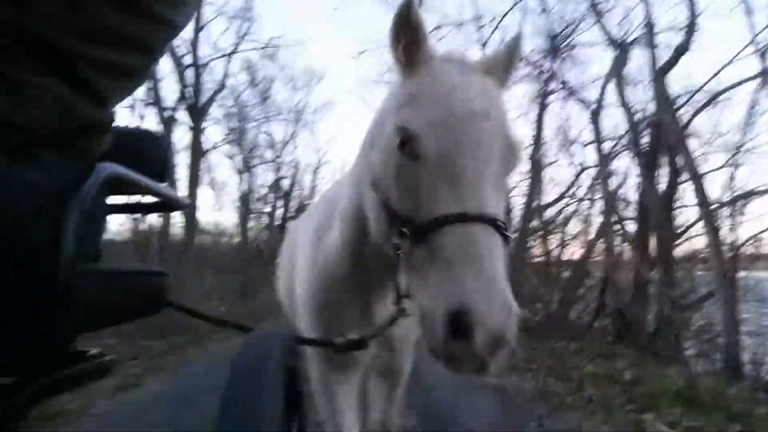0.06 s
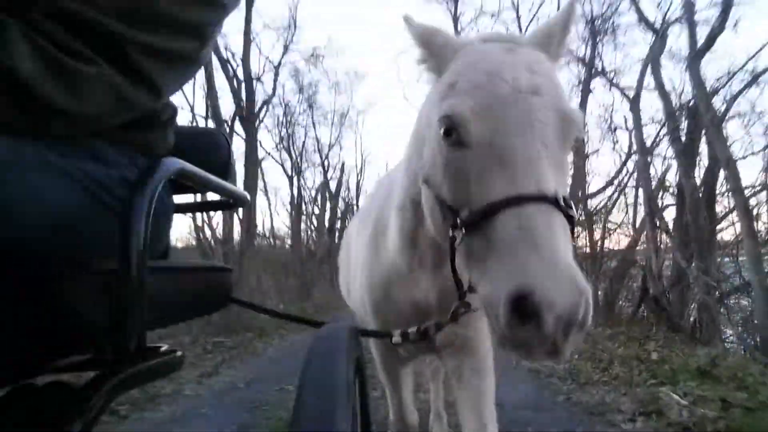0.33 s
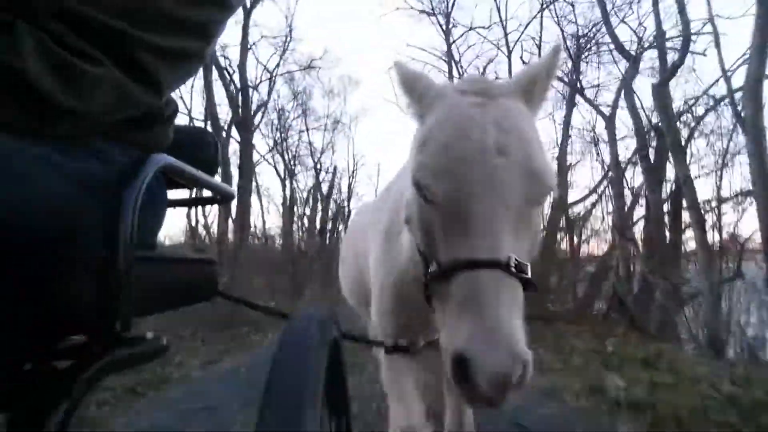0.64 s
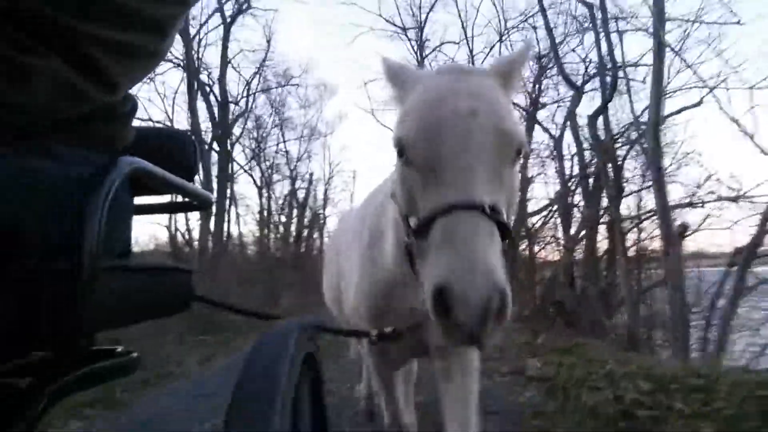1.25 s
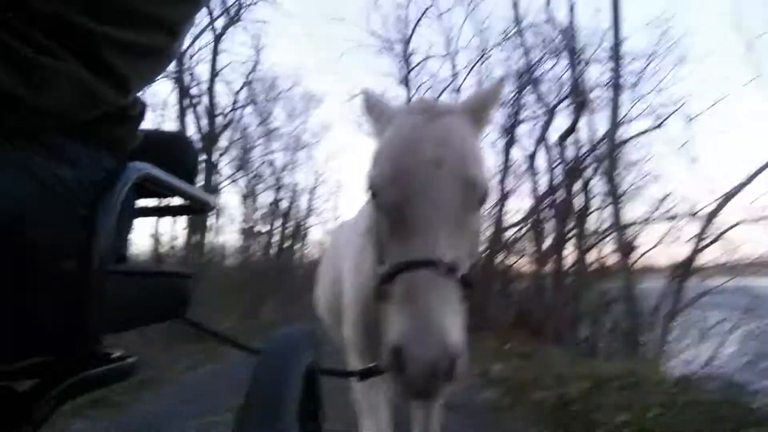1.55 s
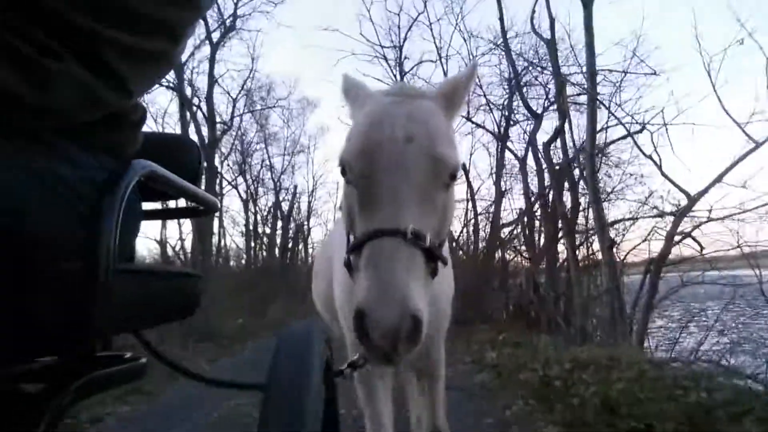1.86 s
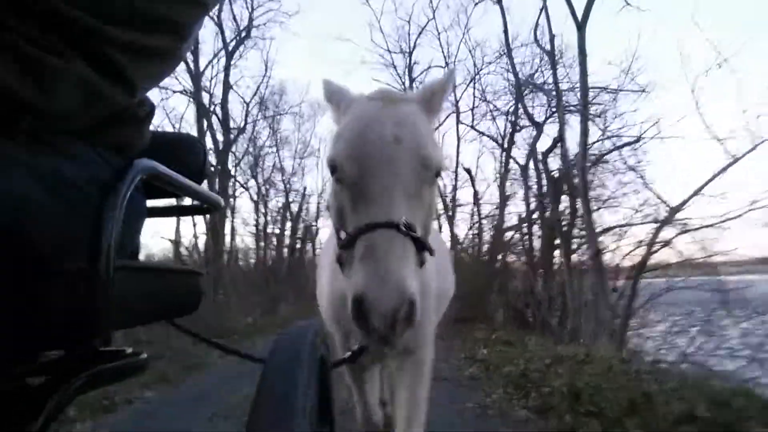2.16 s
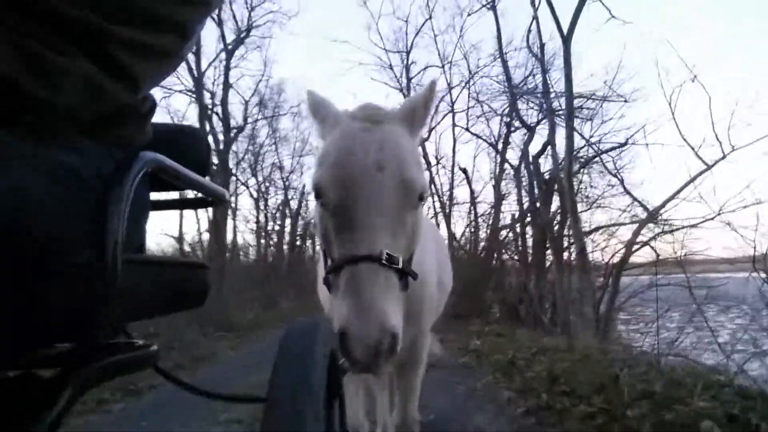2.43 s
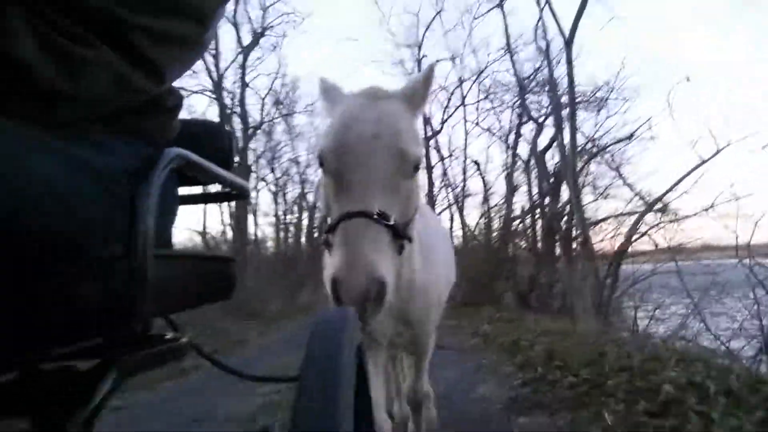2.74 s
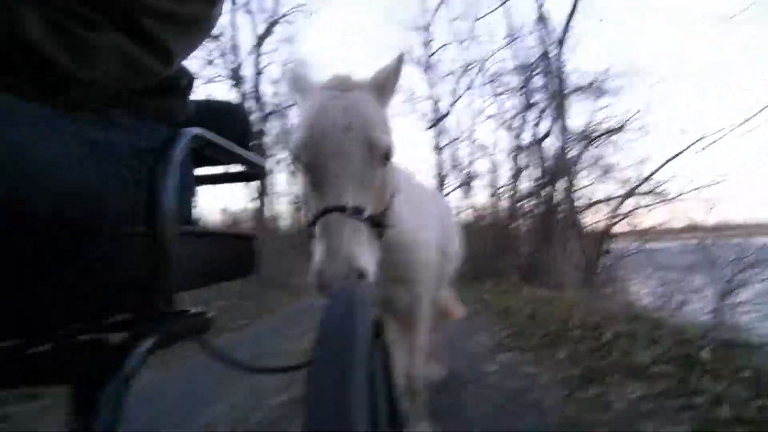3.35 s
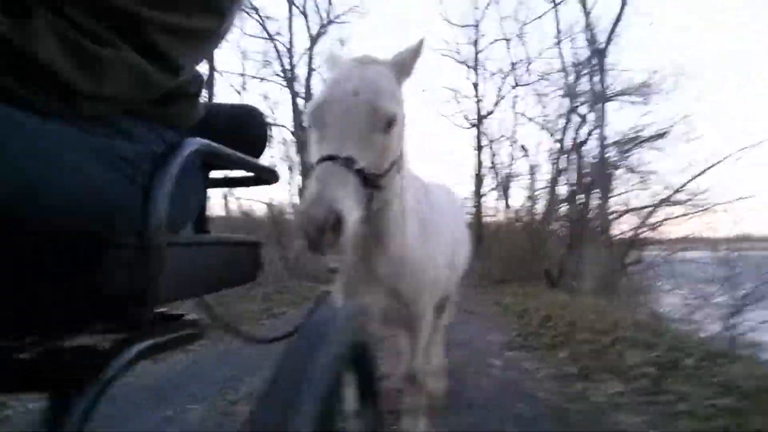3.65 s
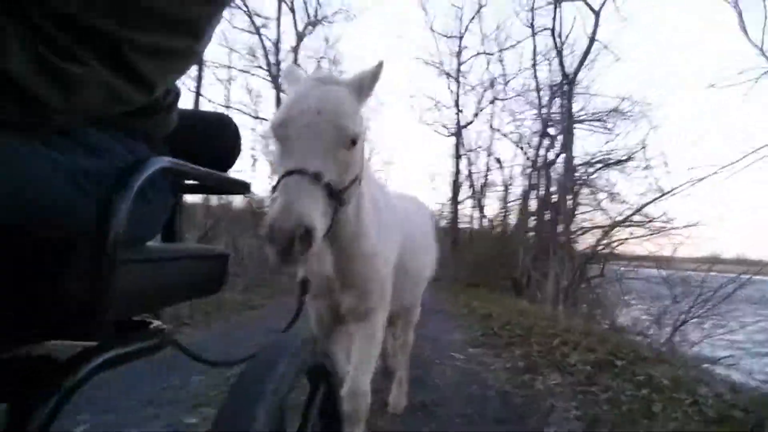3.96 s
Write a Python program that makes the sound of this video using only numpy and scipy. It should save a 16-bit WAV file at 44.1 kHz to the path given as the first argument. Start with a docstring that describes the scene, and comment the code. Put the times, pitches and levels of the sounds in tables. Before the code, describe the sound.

A light cart rumbles along a gravel path outdoors, grit crunching while a horse's hooves thud softly behind. Two hard clacks come in the first half. The microphone rides on the cart, catching jacket swishes and low wind.

```python
"""On a gravel path, a light cart rolls along with a led horse walking behind it.
The uneven ground shakes the cart into a rumble, and grit crunches under tyres and hooves.
Hoof falls and bumps excite the low modes of the body; hard parts rattle on the frame, with two
hard clacks. The microphone rides on the cart, close to a jacket whose cloth swishes and
crackles by friction. Low wind slowly dies down at both ports, and buffets hit the right one."""
import sys
import numpy as np
from scipy import signal
from scipy.fft import rfft, irfft, next_fast_len
from scipy.io import wavfile

SR = 44100
rng = np.random.default_rng(int(sys.argv[2]) if len(sys.argv) > 2 else 0)


def inscribe(sig):
    """Save sig as 16-bit PCM at rate SR to the path in sys.argv[1].

    A 1-D sig is mono; a 2-D sig holds one channel per row.
    Samples are clipped to [-1, 1] before scaling.
    """
    pcm = np.round(np.clip(np.atleast_2d(sig).T, -1, 1) * 32767)
    wavfile.write(sys.argv[1], SR, pcm.astype(np.int16))


N = 176400
T = np.arange(N) / SR

# Roughness of the path, as the crunch it raises. Each row: time in seconds, level in dB.
ROUGHNESS = [(0, -46), (.34, -46.5), (.46, -40), (.65, -46), (.79, -53), (.87, -41.5), (.95, -51.5),
             (1.12, -40.5), (1.33, -49.5), (1.45, -44), (1.6, -48.5), (1.73, -44), (1.8, -50.5), (1.9, -38),
             (1.98, -50.5), (2.09, -45.5), (2.56, -47.5), (2.65, -45.5), (3.48, -48), (3.83, -46.5),
             (4, -52)]
# Hoof falls and bumps. Each row: time in seconds, level in dB, pulse width in ms.
BLOWS = [(.274, -21, 0.76), (0.931, -24.5, 0.42), (1.040, -14, 0.2), (1.478, -23, 0.44),
         (1.744, -29.5, 0.21), (1.851, -25.5, 0.54), (2.322, -22, 0.43), (2.439, -26.5, 0.17),
         (2.698, -19.5, 0.42), (2.982, -26, 0.95), (3.229, -31.5, 0.22), (3.463, -21.5, 0.54),
         (3.474, -24, 0.34), (3.7539, -21.5, 0.36), (3.974, -23.5, 0.4)]
# Low modes of the cart body. Each row: frequency in Hz, gain in dB, 60 dB decay time in seconds.
BODY_MODES = [(101, -14.5, 0.13), (155, -1.5, 0.046), (252, -1.5, 0.18), (448, 2, 0.097), (640, 8, 0.031)]
BODY_LEFT_DB = -1


def from_db(db):
    """Amplitude ratio of a level in decibels."""
    return 10 ** (np.asarray(db) / 20)


def rms_one(x):
    """Normalisation to an rms of 1."""
    return x / np.sqrt(np.mean(x ** 2) + 1e-20)


def coloured(x, points):
    """Minimum-phase filter through (Hz, dB) points; folding the cepstrum makes it causal."""
    size = next_fast_len(N + SR // 2) // 2 * 2
    hz, db = np.transpose(points)
    bin_hz = np.arange(size // 2 + 1) * SR / size
    gain = from_db(np.interp(np.log(bin_hz + 1), np.log(hz), db))
    cepstrum = irfft(np.log(gain))
    cepstrum[1:size // 2] *= 2
    cepstrum[size // 2 + 1:] = 0
    return irfft(rfft(x, size) * np.exp(rfft(cepstrum)))[..., :N]


def low_pass(x, hz):
    """Second-order low-pass filter."""
    return signal.sosfilt(signal.butter(2, hz, fs=SR, output="sos"), x)


def drift(per_s):
    """Random modulation: straight lines between normally distributed values."""
    return np.interp(T * per_s, np.arange(2000), rng.standard_normal(2000))


def grains(per_s, spread_db):
    """Shot noise: independent clicks of uneven size, with an rms of 1."""
    sizes = from_db(spread_db * np.minimum(rng.exponential(1, N), 5)) * rng.choice([-1, 1], N)
    return rms_one(sizes * (rng.random(N) < per_s / SR))


def stick_slip(depth, per_s=130, decay_s=0.0023):
    """Stick-slip envelope: sudden random releases die away over a steady floor; rms 1."""
    starts = (rng.random(N) < per_s / SR) * rng.uniform(.2, 1, N)
    bursts = rms_one(signal.lfilter([1], [1, -np.exp(-1 / (decay_s * SR))], starts))
    return rms_one(np.hypot(1, depth * bursts))


def ring(force, modes):
    """Modal superposition: a force drives damped resonators of alternating sign."""
    response = 0
    for k, (hz, db, t60) in enumerate(modes):
        radius, angle = from_db(-60 / (t60 * SR)), 2 * np.pi * hz / SR
        poles = [1, -2 * radius * np.cos(angle), radius * radius]
        mode = signal.lfilter([0, np.sin(angle)], poles, force + 1e-18)
        response = response + (-1) ** k * from_db(db) * mode
    return response


def bell(centre_s, width_s):
    """Bell-shaped envelope whose width is its standard deviation."""
    return np.exp(-.5 * np.minimum(((T - centre_s) / width_s) ** 2, 100))


def decay(start_s, decay_s):
    """Exponential decay from a sudden onset."""
    return (T >= start_s) * np.exp(-np.clip((T - start_s) / decay_s, 0, 50))


def push(centre_s, width_ms):
    """Pressure pulse: a compression, then a weaker and wider rarefaction."""
    width_s = width_ms / 1000
    return bell(centre_s, width_s) - 0.59 * bell(centre_s + 4.44 * width_s, 1.43 * width_s)


def placed(x, left_db):
    """Stereo by level difference: the left side is raised or lowered."""
    return np.array([from_db(left_db) * x, x])


def rumble(wind_hz=102, wind_fade_db_per_s=2.5):
    """Forced vibration: the cart rumbles over the path, while low wind at each port slowly dies down."""
    # Spectrum of the rumble. Each row: frequency in Hz, gain in dB.
    spectrum = [(30, -7.5), (60, -0.5), (100, -1), (165, -0.5), (205, -4), (255, -1), (305, -14),
                (540, -15), (900, -33), (3000, -45)]
    jolts = grains(per_s=2500, spread_db=2.5)
    shake = jolts - 0.85 * low_pass(jolts, wind_hz / 2)
    low_wind = 1.78 * low_pass(rng.standard_normal((2, N)), wind_hz) * from_db(-wind_fade_db_per_s * T)
    noise = shake + low_wind + 0.69 * rng.standard_normal((2, N))
    bumps = from_db(2.5 * drift(per_s=20))
    return from_db(-40.5) * rms_one(coloured(noise * bumps, spectrum))


def grit(crack_s=0.0091):
    """Granular noise: fine grit crunches and larger stones crack under load, adding in power."""
    # Cracks of larger stones. Each row: start in seconds, level in dB.
    stones = [(0.655, -35.5), (1.046, -32), (1.107, -31), (1.175, -35), (1.481, -35), (1.849, -41),
              (2.07, -34.5), (2.268, -36.5), (2.303, -36), (2.425, -37.5), (2.801, -40.5), (2.882, -38.5),
              (2.978, -35), (3.254, -40), (3.267, -35), (3.507, -34.5), (3.799, -29.5), (3.819, -36.5),
              (3.891, -38)]
    # Spectrum of crushed grit. Each row: frequency in Hz, gain in dB.
    spectrum = [(300, -15), (650, 1), (1200, -1.5), (2000, 5), (2700, 2.5), (3500, -16.5), (4700, -10.5),
                (5500, -15), (6800, -5), (8300, -31), (11000, -4), (15000, -39)]
    bed_db = np.interp(T, *np.transpose(ROUGHNESS)) + 1.9 * drift(per_s=60)
    bed = from_db(bed_db) * stick_slip(depth=from_db(-0.5))
    cracks = sum(from_db(db) * decay(s, crack_s) for s, db in stones)
    scuffs = sum(from_db(db - 20) * bell(s, crack_s) for s, db, _ in BLOWS)  # each blow crushes grit
    level = np.hypot(bed, cracks + scuffs)
    clicks = grains(per_s=3000, spread_db=2)
    texture = clicks + np.array([[1.0], [.4]]) * rng.standard_normal((2, N))
    return from_db(-1) * coloured(level * texture, spectrum) / np.std(coloured(texture, spectrum))


def cloth(snap_s=0.0015):
    """Stick-slip friction: threads slip in dense grains that swell with each swish; creases snap."""
    # Swishes of the jacket. Each row: centre in seconds, level in dB, width in seconds.
    swishes = [(0.02, -40.5, 0.062), (0.379, -32, 0.022), (0.855, -40.5, 0.029), (1.057, -39.5, 0.013),
               (1.129, -33, 0.01), (1.33, -40.5, 0.071), (1.703, -38, 0.015), (1.757, -35.5, 0.017),
               (1.911, -30, 0.0081), (2.095, -34, 0.017), (2.281, -41, 0.025), (2.453, -35.5, 0.0086),
               (2.484, -37.5, 0.011), (2.652, -31, 0.014), (2.741, -40.5, 0.018), (2.813, -39.5, 0.021),
               (2.946, -33, 0.0053), (3.145, -38, 0.014), (3.264, -39, 0.0083), (3.439, -36.5, 0.014),
               (3.666, -38, 0.047), (3.88, -41.5, 0.015)]
    # Snaps of creasing cloth or tack. Each row: start in seconds, level in dB, left gain in dB.
    creases = [(.2705, -33.5, 6), (.3445, -36, 4), (.367, -26.5, 6), (1.035, -24.5, -7), (1.1025, -28, 4),
               (1.7402, -30, 4), (2.0885, -31, 10), (2.505, -25, 5), (2.641, -26, 9), (2.937, -22.5, 3),
               (3.582, -24, -6)]
    # Spectrum of rubbing cloth. Each row: frequency in Hz, gain in dB.
    spectrum = [(1000, -20), (3500, -29.5), (4800, -14), (5600, -20.5), (6800, -7.5), (8300, -28),
                (10000, -4.5), (12000, -0.5), (14400, -0.5), (16000, -3)]
    jolt_db = np.interp(T, *np.transpose(ROUGHNESS))
    bed = from_db(-45.5 + 0.7 * (jolt_db - jolt_db.mean()))  # rough ground shakes the jacket too
    swish_power = sum((from_db(db) * bell(s, width)) ** 2 for s, db, width in swishes)
    flicker = from_db(1.5 * drift(per_s=170)) * stick_slip(depth=0.73)
    level = np.sqrt(bed ** 2 + swish_power) * flicker
    slips = np.array([grains(per_s=9800, spread_db=3) for _ in range(2)])
    slips += 0.48 * grains(per_s=15000, spread_db=3)  # common to both ports
    snap_level = sum(placed(from_db(db) * (decay(s, snap_s) + 2 * decay(s, snap_s / 10)), left_db)
                     for s, db, left_db in creases)
    snaps = snap_level * rng.choice([-1, 1], (2, N))
    return from_db(5.5) * coloured(level * rms_one(slips) + snaps, spectrum)


def wind(gust_s=0.014):
    """Turbulent pressure: buffets hit the right port amid eddies that the left catches faintly."""
    # Buffets of wind. Each row: time in seconds, level in dB, pulse width in ms.
    buffets = [(.053, -21, 1.9), (0.099, -18, 0.98), (0.194, -20.5, 1.9), (0.69, -18.5, 1.17),
               (0.716, -21.5, 1.05), (0.747, -19.5, 1.46), (.769, -26.5, 1.4), (1.444, -20, 1.46),
               (1.477, -19, 1.3), (2.166, -20.5, 2.5), (2.2145, -12, 0.74), (2.241, -14.5, 0.99),
               (2.833, -21, 1.3)]
    # Spectrum of the turbulence. Each row: frequency in Hz, gain in dB.
    spectrum = [(20, -20.5), (80, 14.5), (450, -17.5), (1100, -52.5)]
    pushes = sum(from_db(db) * push(s, ms) for s, db, ms in buffets)
    gust_power = sum(from_db(db / 2 - 20.5) ** 2 * bell(s, gust_s) for s, db, _ in buffets)
    eddies = rms_one(coloured(rng.standard_normal((2, N)), spectrum))
    left, right = placed(np.sqrt(gust_power), left_db=-11.5) * eddies
    return np.array([left, right + pushes])


def thuds():
    """Pulse excitation: soft blows set the low modes of the body humming."""
    pulses = placed(sum(from_db(db) * push(s, ms) for s, db, ms in BLOWS), BODY_LEFT_DB)
    return pulses + from_db(-54.5) * ring(pulses, BODY_MODES)


def knocks(buzz_s=0.013, treble_hz=3540):
    """Impact excitation: each hard contact cracks, chatters, buzzes and rings the frame and body."""
    # Hard parts striking the frame.
    # Each row: start in seconds, level in dB, decay time of the chatter in seconds, treble gain in dB.
    impacts = [(0.4114, 0.5, 0.0067, 5), (0.4209, -8.5, 0.0077, -6), (0.429, -13, .006, -4),
               (0.6354, -10.5, 0.001, -7), (0.8894, -6.5, 0.00097, -2.5), (1.2691, -17.5, 0.00074, -5),
               (1.4014, -2.5, 0.0022, 0.5), (1.4036, -4, 0.0066, -10), (1.43, -29, .002, -14),
               (2.1681, -19, .003, 5.5), (3.012, -22, 0.0013, 2)]
    # Modes of the frame. Each row: frequency in Hz, gain in dB.
    frame_modes = [(1130, -10), (1262, -15), (1510, -9), (1630, 1), (1960, -7.5), (2227, -11), (2480, -4),
                   (2590, 1.5)]
    # Spectrum of a contact's crack. Each row: frequency in Hz, gain in dB.
    spectrum = [(200, -25.5), (700, -6), (1100, 3), (1650, 9.5), (2650, 11), (3200, -12), (4500, -3),
                (7400, -1), (8500, -31), (10500, 1), (14500, -3.5)]
    force, dull, bright = np.zeros((3, N))
    chatter = grains(per_s=5000, spread_db=1.0)
    for s, db, chatter_s, treble_db in impacts:
        hit = np.zeros(N)
        hit[int(s * SR)] = from_db(db)
        contact = hit + from_db(db + 4.5) * chatter * decay(s, chatter_s) / np.sqrt(chatter_s * SR / 2)
        coupling_db = 0.66 * db  # weak knocks ring less than hard clacks
        force += from_db(coupling_db) * (hit + contact) / 2
        buzz = chatter[::-1] * decay(s, buzz_s) / np.sqrt(buzz_s * SR / 8)  # loose parts
        dull += contact + from_db(coupling_db - 8.5) * buzz
        bright += from_db(treble_db) * contact * decay(s, 2 * chatter_s)
    # Higher modes die sooner: 60 dB in 0.074 s at 2 kHz.
    damped_modes = [(hz, db, 0.074 * np.sqrt(2000 / hz)) for hz, db in frame_modes]
    crack = coloured(bright + low_pass(dull - bright, treble_hz), spectrum)
    frame = from_db(0.5) * crack + from_db(-23.5) * ring(force, damped_modes)
    return placed(frame, left_db=-4) + from_db(-37.5) * ring(force, BODY_MODES)


def judders(width_s=0.021):
    """Resonance: runs of small jolts drive the two highest body modes, which sound hollow."""
    # Patches of rough ground. Each row: centre in seconds, level in dB.
    patches = [(.735, -45), (1.73, -53), (1.906, -42.5), (2.19, -43)]
    level = sum(from_db(db) * bell(s, width_s) for s, db in patches)
    hollow = rms_one(ring(grains(per_s=600, spread_db=-1), BODY_MODES[-2:]))
    return placed(level * hollow, BODY_LEFT_DB)


def scene(left_lag_ms=0.18):
    """Superposition: the cart reaches the left port late; cloth and wind are at the microphone."""
    left, right = rumble() + grit() + thuds() + knocks() + judders()
    delayed_left = np.interp(T - left_lag_ms / 1000, T, left)
    return np.array([delayed_left, right]) + cloth() + wind()


def record(dry):
    """Frequency response: the left port is muffled in the mids, and both are band-limited."""
    # Sensitivity of the left port against the right. Each row: frequency in Hz, gain in dB.
    left_response = [(40, 1), (250, -5), (500, -2.5), (700, -8), (1200, -11.5), (2000, -14), (4200, -11.5),
                     (6800, -22), (9000, -7), (11000, -13.5), (13000, -1.5), (14400, 4.5)]
    ports = np.array([coloured(dry[0], left_response), dry[1]])
    low_cut = signal.butter(1, 18, "high", fs=SR, output="sos")
    port_roll_off = signal.ellip(7, .5, 38, 14490, fs=SR, output="sos")
    high_cut = signal.cheby2(14, 40, 15935, fs=SR, output="sos")
    return signal.sosfilt(np.vstack([low_cut, port_roll_off, high_cut]), ports)


dry = scene()
out = record(dry)
inscribe(out)
```